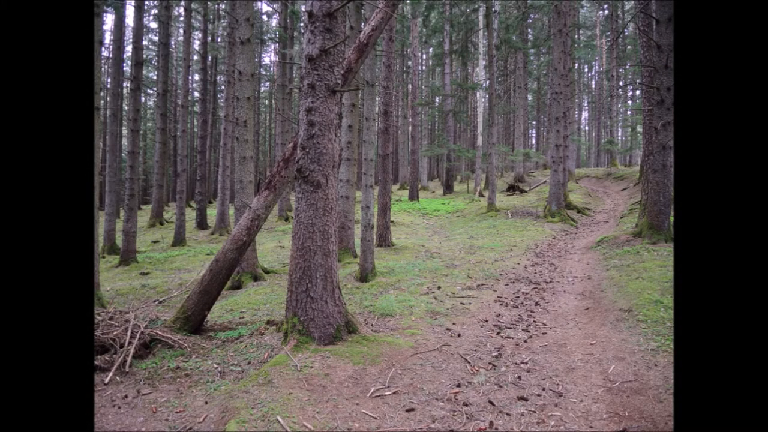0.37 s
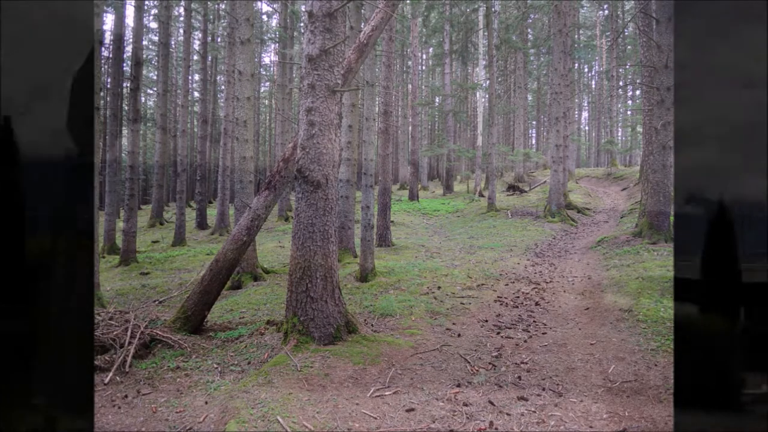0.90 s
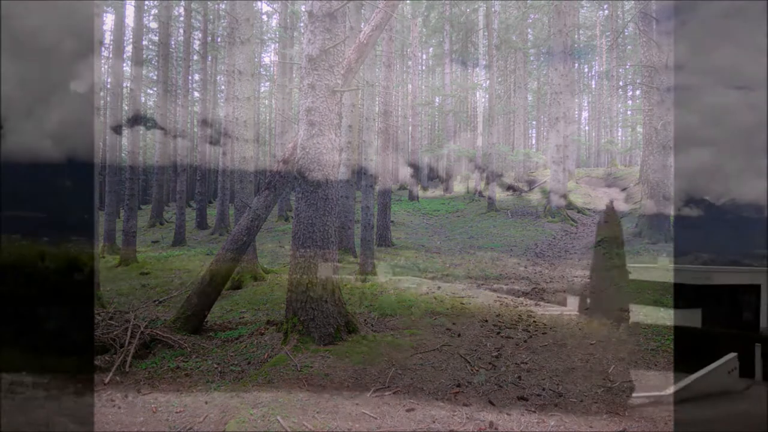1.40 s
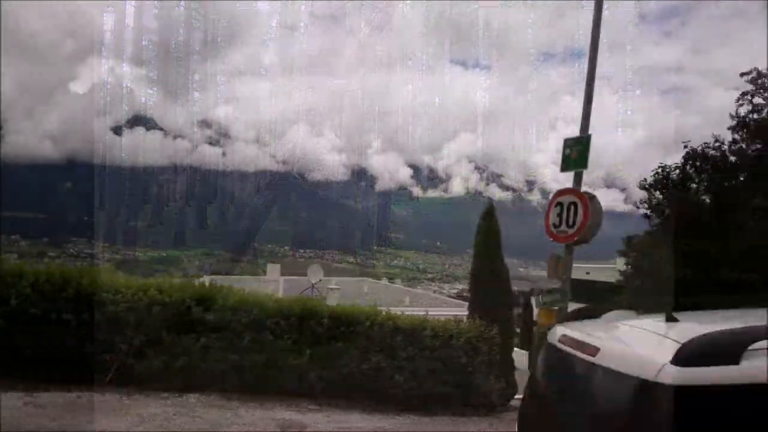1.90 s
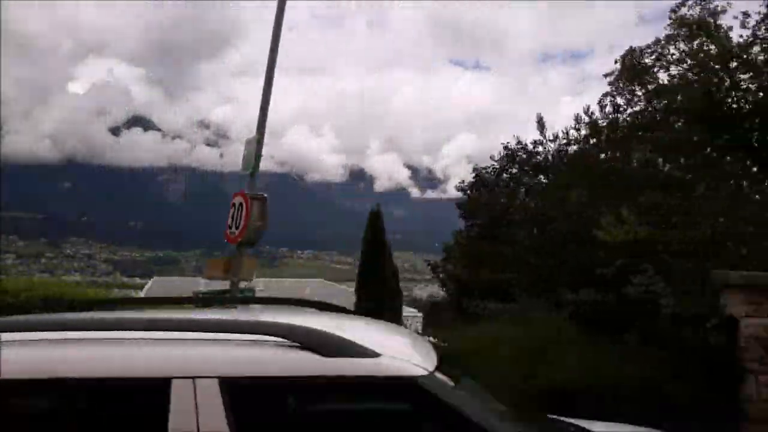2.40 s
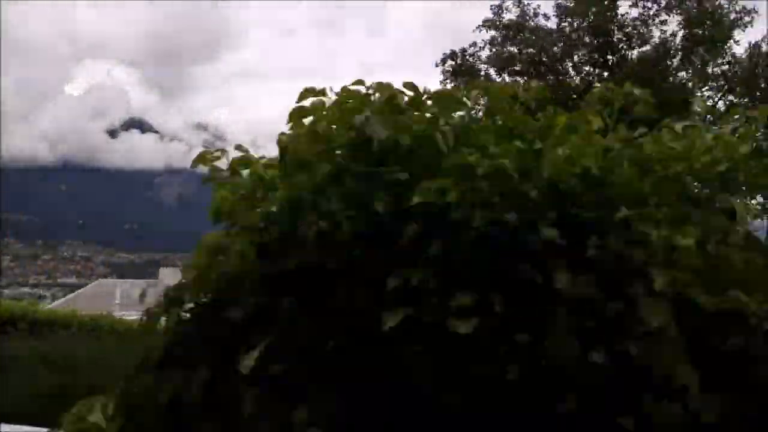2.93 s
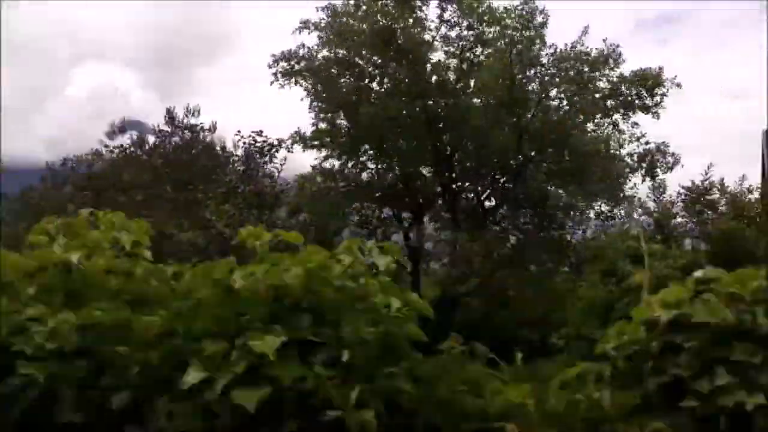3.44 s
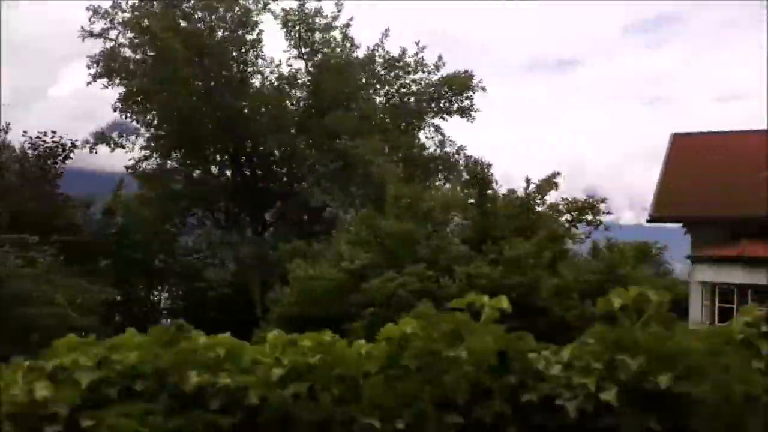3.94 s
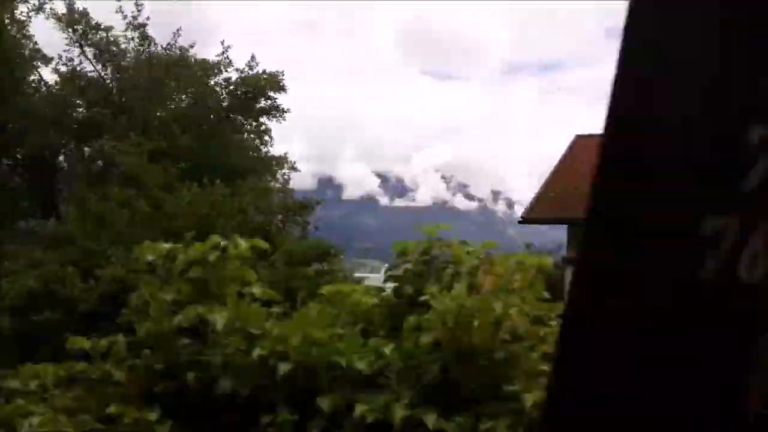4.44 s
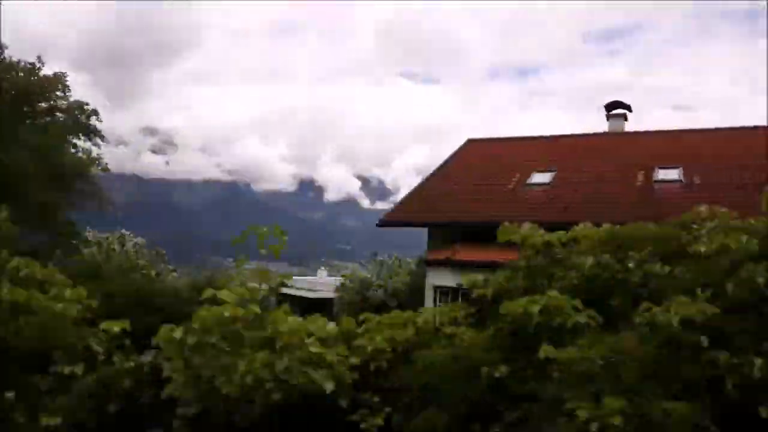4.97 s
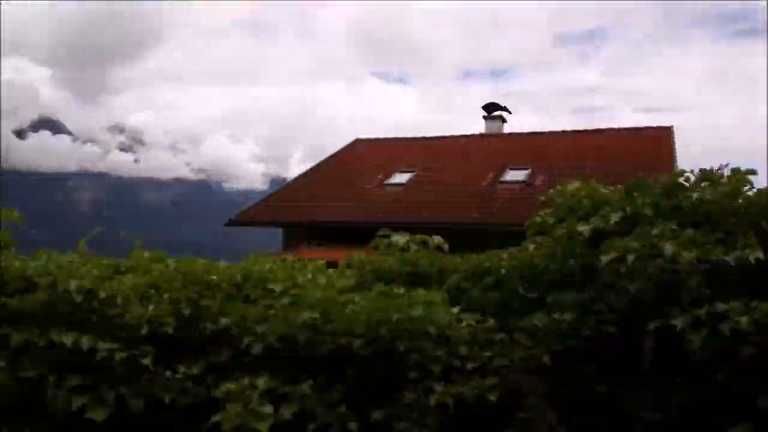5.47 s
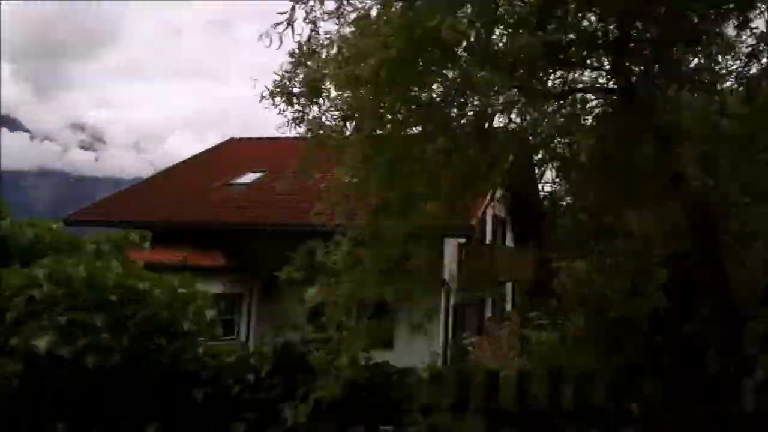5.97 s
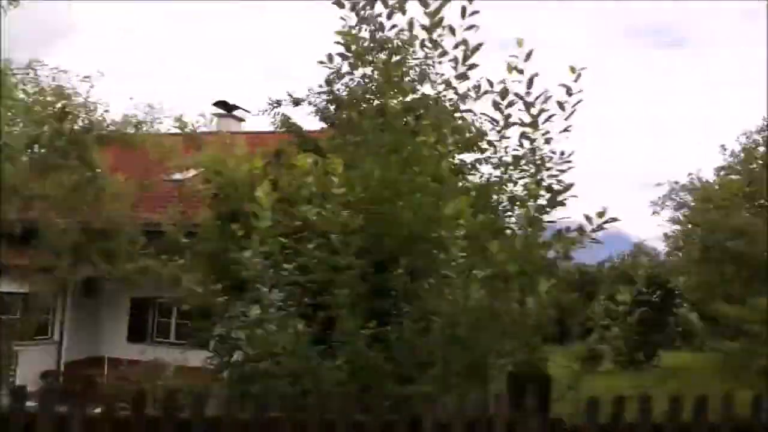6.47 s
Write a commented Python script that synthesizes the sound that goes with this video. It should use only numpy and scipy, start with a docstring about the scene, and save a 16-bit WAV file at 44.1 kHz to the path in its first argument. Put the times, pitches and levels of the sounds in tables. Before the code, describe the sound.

A mono outdoor microphone hears dense overlapping birdsong, blurred by woodland echoes, with a brief high trill and a nearby hollow knock in the first second. The chorus then fades into a quieter background of faint traffic rumble. Sharp two-voiced chirps recur about every half second, between clear short whistles and rough notes. Soft low handling thumps come near the end, and birds sing until the cut.

```python
"""A loud, dense chorus of songbirds among trees, over the low rush of the wood. In the first two and a half
seconds the far chorus and the hiss sink to a quieter level, the rush fades out and distant traffic comes in.
Nearer birds are gliding tones, clear or rough, scattered by the trunks: short whistles, a high trill, and
one bird that repeats a cycle of two-voiced chirps. Far birds are random short notes over a noise wash.
The noise layers are shaped in pitch; a hollow knock and soft bumps on the microphone are short tones."""
import sys
import numpy as np
from scipy import signal
from scipy.fft import rfft, irfft
from scipy.io import wavfile
from scipy.ndimage import uniform_filter1d

SR = 44100
rng = np.random.default_rng(int(sys.argv[2]) if len(sys.argv) > 2 else 0)


def voltage_ratio(decibels):
    """Convert decibels (scalar or array-like) to amplitude ratios, 20 dB per decade."""
    exponent = np.asarray(decibels, float) / 20
    return 10 ** exponent


def pcm_store(signal):
    """Save signal as 16-bit PCM."""
    levels = np.round(np.clip(np.atleast_2d(signal), -1, 1) * 32767)
    wavfile.write(sys.argv[1], SR, levels.astype(np.int16).T)


N = 291501  # length in samples
TIME = np.arange(N) / SR


def unit(x):
    """Scale to an rms of 1."""
    return x / np.sqrt(np.mean(x ** 2))


def colour(x, spectrum):
    """Filter a sound with a curve of (pitch_hz, level_db) points, then scale it to an rms of 1."""
    hz, db = np.transpose(spectrum)
    bins_hz = np.arange(N // 2 + 1) * SR / N + 1
    curve_db = np.interp(np.log(bins_hz), np.log(hz), db, -99, -99)
    return unit(irfft(rfft(x) * voltage_ratio(curve_db), N))


def walk(rate_hz):
    """Random wandering with an rms of 1: noise smoothed twice over 1 / rate_hz seconds."""
    window = int(SR / rate_hz)
    smooth = uniform_filter1d(rng.standard_normal(N), window)
    return unit(uniform_filter1d(smooth, window))


def crossfade(start_db, later_db):
    """Gain of a background layer that passes from its starting level to its later level."""
    from_s, to_s = 0.28, 2.39
    gone = np.clip((TIME - from_s) / (to_s - from_s), 0, 1)
    old = voltage_ratio(start_db) * (1 - gone) ** 0.87
    new = voltage_ratio(later_db) * gone ** 0.13  # most of the later sound comes in early
    return np.hypot(old, new)


def swells(table):
    """Bell-shaped rises of gain from rows of (centre_s, half_width_s, peak_db)."""
    return sum(voltage_ratio(db) * np.exp(-((TIME - s) / half) ** 2) for s, half, db in table)


def rasp():
    """Quick random shaking for the pitch and the loudness of a rough voice."""
    return np.array([walk(600), walk(500)])


def add(out, start_s, points, edge_s, wobble):
    """Sing a gliding tone along (s, pitch_hz, level_db, roughness) points; roughness shakes pitch and loudness."""
    s, *columns = np.transpose(points)
    t = np.arange(s[0], s[-1], 1 / SR)
    hz, db, rough = (np.interp(t, s, column) for column in columns)
    i = max(int((start_s + s[0]) * SR), 0)
    first = i % (wobble.shape[1] - len(t))
    pitch_shake, level_shake = rough * wobble[:, first:first + len(t)]
    ends = np.clip(np.minimum(t - s[0], s[-1] - t) / edge_s, 0, 1)
    phase = 2 * np.pi * np.cumsum(hz * (1 + 0.0951 * pitch_shake)) / SR
    tone = np.sqrt(2) * ends * voltage_ratio(db + 2.3 * level_shake) * np.sin(phase)
    out[i:i + len(t)] += tone[:N - i]


def sing(notes, rough):
    """Sing (start_s, length_s, first_hz, last_hz, level_db) notes, each shaking in its own way."""
    out, wobble = np.zeros(N), rasp()
    for (s, length, first_hz, last_hz, db), mood in zip(notes, rng.random(len(notes))):
        points = [(0, first_hz, db, rough), (length, last_hz, db, rough)]
        add(out, s, points, edge_s=0.008, wobble=wobble[:, int(mood * N / 2):])
    return out


def trees(x, direct_db, first_t60, second_db, second_t60):
    """Scatter from trunks: the direct sound plus two dense random echoes, each dying by 60 dB in its t60 seconds."""
    t = np.arange(SR) / SR
    first, second = (unit(rng.standard_normal(SR) * voltage_ratio(-60 * t / t60)) / np.sqrt(SR)
                     for t60 in (first_t60, second_t60))
    echo = first + voltage_ratio(second_db) * second
    # stirring leaves shake what they scatter, so that the tail of a pure note spreads in pitch
    stirred = x * voltage_ratio(4 * walk(120))
    total = voltage_ratio(direct_db) * x + signal.fftconvolve(stirred, echo)[:N]
    return total / np.sqrt(voltage_ratio(2 * direct_db) + np.sum(echo ** 2))


def traffic():
    """Distant traffic: low noise that wavers a little, comes in early and swells once."""
    # tone of the rumble: pitch_hz, level_db (per Hz, relative)
    rumble_curve = [(12, -44), (20, -22), (49, -16.5), (122, -1), (218, -8), (286, -5), (420, -14),
                    (499, -5.5), (667, -6.5), (720, -3), (857, -6), (980, -1.5), (1390, -16), (2000, -16.5),
                    (2600, -35.5), (4400, -120)]
    # the swell: centre_s, half_width_s, peak_db
    passing_swell = [(4.9, 1.43, -81)]
    gain = crossfade(-np.inf, -71.5) + swells(passing_swell)
    return colour(rng.standard_normal(N), rumble_curve) * gain * voltage_ratio(1.0 * walk(24))


def wood():
    """The low rush of the wood: wavering low noise that fades out as the traffic comes in."""
    # tone of the rush: pitch_hz, level_db (per Hz, relative)
    rush_curve = [(12, -51), (20, -29), (97, -4.5), (225, -10.5), (323, -3.5), (572, -7.5), (837, -2),
                  (1400, -13), (1630, -15.5), (1760, -19), (1900, -35.5), (2470, -20.5), (4180, -120)]
    gain = crossfade(-55.5, -np.inf)
    return colour(rng.standard_normal(N), rush_curve) * gain * voltage_ratio(0.7 * walk(4.5))


def hiss():
    """Faint treble noise that flickers, with a few puffs that start suddenly and die away."""
    # tone of the hiss: pitch_hz, level_db (per Hz, relative)
    hiss_curve = [(5000, -29), (7500, -3.5), (9500, -5), (12000, -3.5), (14500, -3), (15700, 2)]
    # puffs: start_s, level_db, t60_s (time to die by 60 dB)
    puff_table = [(0.83, -71, 0.28), (3.02, -92, 0.13), (3.559, -93, 0.18), (5.735, -88, 0.51)]
    puffs = sum((TIME > s) * voltage_ratio(db - 60 * np.abs(TIME - s) / t60) for s, db, t60 in puff_table)
    steady = crossfade(-81, -92.5) * voltage_ratio(0.96 * walk(25))
    return colour(rng.standard_normal(N), hiss_curve) * (steady + puffs)


def bumps():
    """Soft low thumps of a cycle or two, as of a hand on the microphone body: sines under a bell curve."""
    # thumps: start_s, level_db (of the bell curve), pitch_hz
    thumps = [(5.018, -65, 146), (5.106, -60, 165), (5.331, -72, 127), (5.438, -57.5, 102),
              (5.55, -60, 150), (5.971, -60, 125), (6.02, -60, 104)]
    late_s, width_s = 0.0144, 0.0032  # delay of the bell's middle after start_s, and its spread
    out = np.zeros(N)
    for s, db, hz in thumps:
        t = TIME - s - late_s
        out += voltage_ratio(db) * np.exp(-(t / width_s) ** 2 / 2) * np.sin(2 * np.pi * hz * t)
    return out


def knock():
    """A hollow knock close by: a few dying tones that ring freely for a moment, then are damped."""
    # the knock: start_s, level_db (added to each tone)
    start_s, level_db = (.715, -42.5)
    # its ringing tones: pitch_hz, level_db (relative), t60_s (time to die by 60 dB)
    ringing = [(133.7, -6, 0.33), (207.4, -3, 0.51), (290, -1, 0.49), (397, -11, 0.33), (580, 2.5, 0.49)]
    rise_s, free_s = 0.014, 0.031
    t = np.maximum(TIME - start_s, 0)
    shape = np.interp(t, [0, rise_s, free_s, free_s + rise_s], [0, 1, 1, voltage_ratio(-10)])
    tones = sum((-1) ** k * voltage_ratio(db - 60 * t / t60) * np.sin(2 * np.pi * hz * t)
                for k, (hz, db, t60) in enumerate(ringing))
    return voltage_ratio(level_db) * shape * tones


def far_birds(count, low_hz, high_hz, spectrum, blur):
    """Random short gliding notes drowned in echo, over a noise wash of the same pitch range."""
    out, wobble = np.zeros(N), rasp()
    for s, pitch, length, glide, rough in rng.random((count, 5)):
        hz = low_hz * (high_hz / low_hz) ** pitch
        length_s = 0.01497 + 0.0662 * length
        last_hz = hz * (1 + 0.37 * (glide - 0.5))
        note = [(0, hz, 0, 0.6 * rough), (length_s, last_hz, 0, 0.45 * rough)]
        add(out, s * N / SR, note, edge_s=0.013, wobble=wobble)
    notes = unit(trees(out, direct_db=-18, first_t60=0.63, second_db=1.5, second_t60=0.35))
    wash = colour(rng.standard_normal(N), [(low_hz, 0), (high_hz, 0)])
    return colour(notes + blur * wash, spectrum)


def far_chorus():
    """The many far birds: blurred random notes that sink in level and swell now and then."""
    # tone of the chorus: pitch_hz, level_db (per Hz, relative)
    chorus_curve = [(880, -41.5), (1500, -18.5), (1940, 1), (2630, -0.5), (3240, -1), (3500, -4.5),
                    (3640, -2), (4810, -6.5), (6000, -31.5), (7800, -65), (13200, -120)]
    # swells: centre_s, half_width_s, peak_db
    chorus_swells = [(0, 0.093, -47), (1.2, 0.067, -57), (3.3, 0.17, -78), (4.36, 0.095, -85.5),
                     (5.49, 0.16, -73.5), (6.13, 0.12, -67), (6.61, 0.34, -70.5)]
    far = far_birds(count=400, low_hz=1472.6, high_hz=6068, spectrum=chorus_curve, blur=1.0)
    return far * (crossfade(-53, -70.5) + swells(chorus_swells))


def shrill_birds():
    """The shrillest far voices: higher blurred notes that sink in level and come in gusts."""
    # tone of the shrill voices: pitch_hz, level_db (per Hz, relative)
    shrill_curve = [(3060, -34.5), (5200, -6), (5760, -10), (5940, -8.5), (6570, -11.5), (7860, -19.5),
                    (10200, -56), (17300, -120)]
    # gusts: centre_s, half_width_s, peak_db
    gusts = [(1.1, 0.16, -67), (2.34, 0.13, -74.5), (2.75, 0.14, -82), (3.6, 0.054, -87), (4.18, .07, -82),
             (4.56, 0.04, -84), (4.8, .1, -77.5), (5.36, 0.19, -84), (5.65, 0.027, -80),
             (6.06, 0.051, -78.5), (6.61, 0.08, -75.5)]
    shrill = far_birds(count=200, low_hz=5200, high_hz=9470, spectrum=shrill_curve, blur=1.1)
    return shrill * (crossfade(-71, -88) + swells(gusts))


def trill():
    """One high trill, far off and blurred: fast falling sweeps that swell, then weaken."""
    # the trill: start_s, length_s, top_hz, bottom_hz, sweeps a second
    s, length, top_hz, bottom_hz, rate = (.245, .27, 8050, 6300, 30)
    out, wobble = np.zeros(N), rasp()
    for k in np.arange(0, length, 1 / rate):
        db = -55.5 - 9 * (2 * k / length - 1.1) ** 2
        sweep = [(0, top_hz, db - 3, 0.08),
                 (0.31 / rate, 0.92 * top_hz, db, 0.15),
                 (1.3 / rate, bottom_hz, db - 2.5, 0.1)]  # runs on into the next sweep
        add(out, s + k, sweep, edge_s=0.0023, wobble=wobble)
    return trees(out, direct_db=-12, first_t60=0.21, second_db=-11, second_t60=0.55)


def whistlers():
    """Other birds: clear notes come mostly straight and flutter, raspy ones come from deep among the trees."""
    # clear notes of the nearer birds: start_s, length_s, first_hz, last_hz, level_db
    clear_notes = [(0, 0.077, 3218, 3190, -41.5), (0, 0.18, 3710, 3770, -67),
                   (.027, 0.057, 4650, 4700, -67), (.03, 0.14, 4940, 5100, -70),
                   (.045, 0.046, 5600, 5640, -63), (.106, 0.052, 3335, 3362, -48.5),
                   (.103, 0.192, 1722, 1786, -53), (.325, .11, 3230, 3210, -52.5),
                   (.447, 0.21, 2394, 2280, -50), (.62, 0.222, 2660, 2716, -57.5),
                   (.626, 0.058, 6700, 6620, -59), (.679, 0.084, 3755, 3760, -56.5),
                   (.765, .12, 6620, 6460, -64), (.807, 0.043, 5660, 5640, -62),
                   (.837, .045, 3210, 3380, -54), (.875, 0.064, 5660, 5680, -63.5),
                   (.994, 0.037, 6260, 6330, -68), (1.056, .04, 4870, 5480, -68),
                   (1.082, 0.12, 2173, 2223, -55.5), (1.151, 0.036, 4600, 4870, -58),
                   (1.255, 0.054, 4550, 4370, -52.5), (1.301, 0.057, 3610, 5420, -52.5),
                   (1.51, 0.026, 3940, 3800, -56.5), (1.604, 0.056, 4000, 5150, -58),
                   (1.855, 0.089, 2030, 2008, -54.5), (1.935, 0.038, 1610, 1660, -59.5),
                   (2.053, 0.046, 2920, 2910, -53), (2.07, .061, 3180, 3090, -60),
                   (2.184, 0.039, 4700, 3240, -68), (2.572, 0.056, 3080, 3550, -75),
                   (2.718, 0.077, 3680, 3626, -73), (2.891, 0.034, 2960, 3040, -67),
                   (3.18, .039, 2510, 2557, -61), (3.324, 0.012, 2090, 1960, -67),
                   (3.72, 0.18, 2320, 2305, -70.5), (3.733, .056, 6020, 5930, -75),
                   (3.847, 0.035, 6970, 7240, -78), (4.068, 0.028, 4480, 3800, -64.5),
                   (4.154, 0.057, 3123, 3090, -53.5), (4.161, 0.025, 1908, 2090, -73),
                   (4.24, 0.057, 2450, 2280, -72), (4.306, 0.11, 2250, 2195, -67),
                   (4.33, .06, 1630, 1710, -75), (4.345, 0.029, 3635, 3625, -56),
                   (5.005, .033, 3730, 2950, -60.5), (5.045, 0.029, 3084, 3070, -52),
                   (5.2, 0.16, 6700, 6900, -87.5), (5.11, .043, 2900, 2460, -66),
                   (5.122, .13, 2280, 2160, -68), (5.262, 0.032, 3070, 3060, -52),
                   (5.395, 0.03, 2480, 2620, -62.5), (5.445, 0.015, 2650, 2560, -57),
                   (5.6, .078, 4900, 3150, -58.5), (5.736, 0.024, 3220, 2900, -60.5),
                   (5.904, 0.056, 3060, 2990, -62), (5.97, .03, 3040, 3143, -54),
                   (6.0, 0.077, 3170, 3160, -61.5), (6.01, 0.11, 2113, 2204, -62.5),
                   (6.1, 0.071, 2174, 2060, -69), (6.134, 0.14, 1664, 1656, -71),
                   (6.26, 0.079, 3220, 3180, -70.5), (6.291, .13, 2380, 2390, -76),
                   (6.557, .069, 2660, 2634, -56)]
    # raspy notes, same columns: start_s, length_s, first_hz, last_hz, level_db
    raspy_notes = [(0, 0.11, 3343, 3230, -47.5), (.372, 0.032, 4250, 4690, -51.5),
                   (5.735, .07, 7000, 7730, -78), (0, 0.073, 2070, 2030, -47), (0, 0.17, 2790, 2566, -50),
                   (.16, 0.13, 3210, 3040, -51.5), (.426, 0.07, 4654, 3500, -48),
                   (.457, .13, 3650, 3490, -48), (.469, .084, 4060, 3890, -49.5),
                   (.489, 0.042, 3204, 3050, -46.5), (.883, 0.14, 6220, 6010, -63.5),
                   (.963, 0.068, 3525, 4120, -56.5), (1.037, 0.026, 4340, 4630, -44),
                   (1.165, 0.1, 4240, 3175, -47), (1.203, .13, 3730, 2947, -61),
                   (1.227, 0.086, 4260, 3380, -54.5), (1.425, 0.058, 3940, 3930, -57),
                   (1.703, 0.029, 3250, 3000, -65), (1.798, 0.12, 1920, 1866, -61),
                   (2.064, 0.09, 4550, 3790, -61), (2.129, 0.12, 2390, 2103, -66.5),
                   (2.443, 0.0298, 4100, 4900, -57.5), (2.529, 0.026, 4260, 5180, -62),
                   (3.509, .053, 4520, 3890, -67), (3.548, 0.019, 5430, 5470, -68),
                   (3.99, 0.045, 3460, 3400, -72), (4.092, 0.11, 4550, 4520, -72),
                   (4.496, 0.078, 2520, 2800, -68.5), (6.148, 0.054, 3380, 2990, -57.5),
                   (6.179, .03, 2800, 3040, -61)]
    # long arching or swelling whistles, each a list of points: time_s, pitch_hz, level_db
    arches = [
        [(1.46, 2057, -63.5), (1.6, 2143, -56), (1.65, 2177, -53.5), (1.685, 2106, -52)],
        [(3.77, 2680, -68), (3.81, 2900, -65), (3.89, 2730, -64), (3.96, 3090, -63), (4.05, 3370, -70)],
        [(4.56, 2670, -77), (4.63, 2940, -71), (4.662, 3025, -67.5), (4.73, 2810, -67.5), (4.78, 2558, -65.5)],
        [(6.44, 2700, -59), (6.492, 2920, -67), (6.54, 3110, -65.5), (6.61, 2970, -61)],
    ]
    # five evenly spaced pips: start_s, spacing_s, length_s, pitch_hz, level_db
    s, spacing, length, hz, db = (1.197, .0355, .021, 1910, -49.5)
    clear_rough, rasp_rough = 0.06, 0.7
    # the first and last pips are 9 dB weaker
    pips = [(s + k * spacing, length, hz, hz, db - 9 * (k in (0, 4))) for k in range(5)]
    near = sing(clear_notes + pips, clear_rough)
    wobble = rasp()
    for arch in arches:
        add(near, 0, [(*point, 2 * clear_rough) for point in arch], edge_s=0.014, wobble=wobble)
    flutter = voltage_ratio(3 * walk(55))
    near = trees(near * flutter, direct_db=5, first_t60=0.18, second_db=-6, second_t60=0.6)
    deep = sing(raspy_notes, rasp_rough)
    return near + trees(deep, direct_db=-0.5, first_t60=0.12, second_db=-1.5, second_t60=1.0)


def chirper():
    """The bird with the four-chirp cycle: raspy gliding strokes, mostly heard through their echoes."""
    # four chirps, each a list of strokes from the two sides of the syrinx (the bird's voice organ);
    # a stroke is a list of points: time_s (from the chirp's start), pitch_hz, level_db (relative)
    chirp_shapes = [
        [[(0, 3966, -9.5), (.008, 4340, -1), (.02, 5500, -11.5), (.032, 5603, 0), (.055, 5220, -6.5),
         (.064, 4650, -2), (.077, 3780, -6), (.1, 3400, -20)], [(.006, 4405, -7), (.05, 4720, -25.5),
         (.105, 4524, -0.5)], [(.112, 3403, -3), (.125, 3850, -1), (.14, 4497, -1), (.168, 3040, -10)]],
        [[(0, 4244, -4.5), (.007, 4880, -9), (.022, 4850, -8.5), (.032, 4463, 2), (.04, 3625, -1.5),
         (.068, 3748, -4.5), (.087, 2690, -13.5)], [(0, 3405, -22), (.015, 3750, -3)], [(.004, 4575, -1),
         (.028, 4406, -11)]],
        [[(0, 3724, -1.5), (.012, 4160, -5.5), (.035, 4094, 7.5), (.078, 4324, -23)], [(.03, 4234, 3),
         (.042, 3700, -2), (.09, 3640, -4.5), (.108, 2584, 2.5)]],
        [[(0, 3080, -20), (.012, 3950, -2.5), (.025, 5200, -11.5), (.07, 5060, -10), (.085, 5610, -15.5),
         (.11, 6210, -6)], [(.03, 3850, -17), (.045, 3640, -1), (.063, 3638, -3.5), (.075, 4433, -3.5),
         (.095, 4137, -9.5), (.115, 2735, 2)]],
    ]
    # for each of the four shapes, when it is sung: start_s, level_db (added), added hoarseness (0-1)
    sung_chirps = [
        [(.37, -52, .1), (2.887, -47.5, .02), (5.318, -48.5, .04)],
        [(1.016, -44, .25), (3.556, -42.5, .08), (6.018, -49, .06)],
        [(1.59, -45.5, .15), (4.14, -46, .01), (6.572, -50.5, .03)],
        [(2.238, -51.5, .08), (4.71, -52.5, .15)],
    ]
    # the voice grows hoarser as a chirp goes on, and as its pitch slides
    tire_per_s, rough_per_khz_a_second = 1.3, 0.0009
    out, wobble = np.zeros(N), rasp()
    for shape, sung in zip(chirp_shapes, sung_chirps):
        for s, db, hoarse in sung:
            for stroke in shape:
                t, hz, stroke_db = np.transpose(stroke)
                slide = np.abs(np.gradient(hz / 1000, t))  # kHz a second
                rough = hoarse + tire_per_s * t + rough_per_khz_a_second * slide
                points = np.transpose([t, hz, db + stroke_db, rough])
                add(out, s, points, edge_s=0.006, wobble=wobble)
    return trees(out, direct_db=-2, first_t60=0.26, second_db=-4.5, second_t60=0.79)


def scene():
    """Nearer singers over the far birds and the low and hissing background, in one channel."""
    background = traffic() + wood() + hiss() + bumps() + knock()
    birds = far_chorus() + shrill_birds() + trill() + whistlers() + chirper()
    return (background + birds)[None]


def roll_off(x):
    """The treble ends steeply here."""
    return signal.sosfilt(signal.butter(12, 15720, fs=SR, output="sos"), x)


def record(dry):
    """Pass on the finished mix."""
    return roll_off(dry)


dry = scene()
out = record(dry)
pcm_store(out)
```